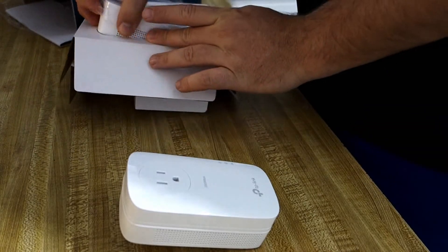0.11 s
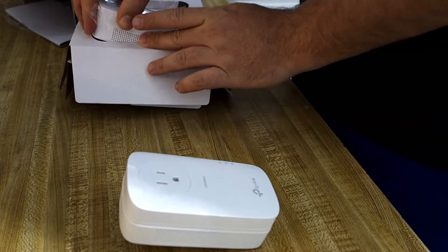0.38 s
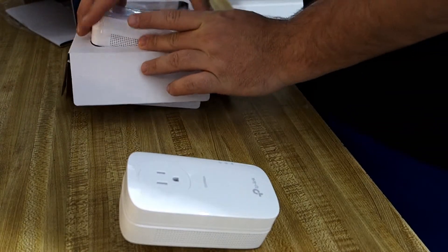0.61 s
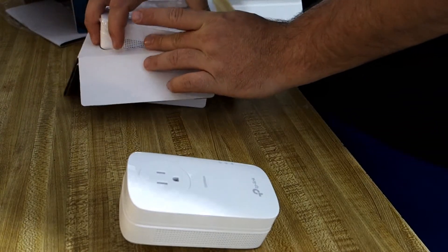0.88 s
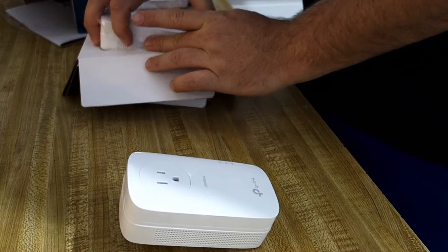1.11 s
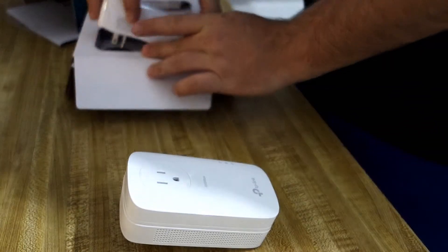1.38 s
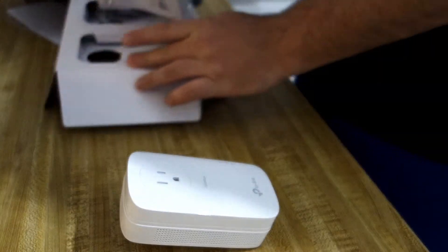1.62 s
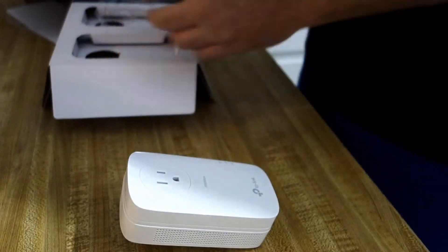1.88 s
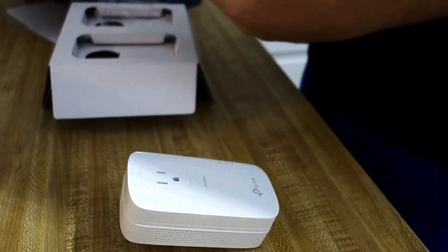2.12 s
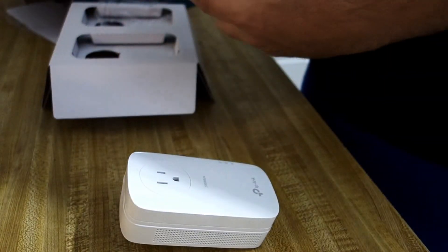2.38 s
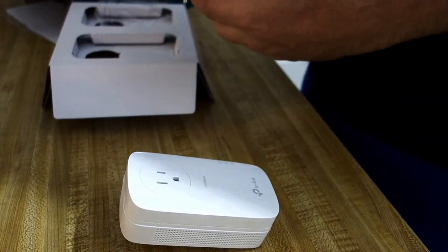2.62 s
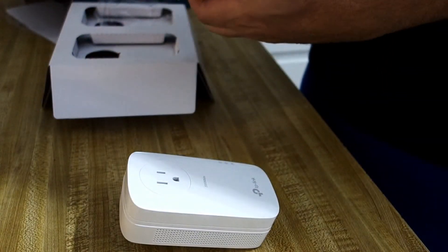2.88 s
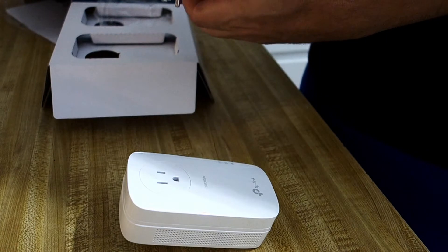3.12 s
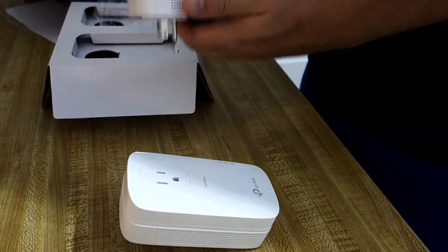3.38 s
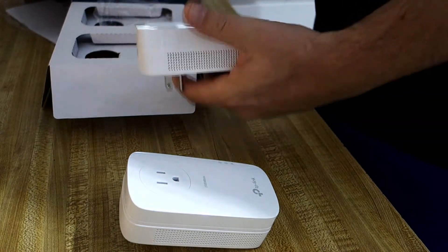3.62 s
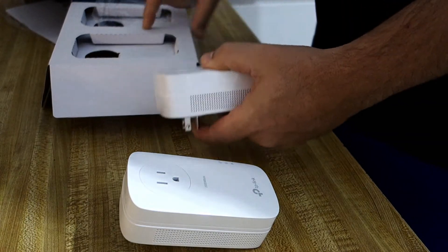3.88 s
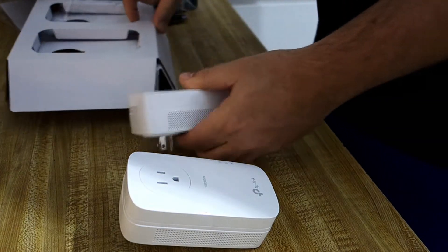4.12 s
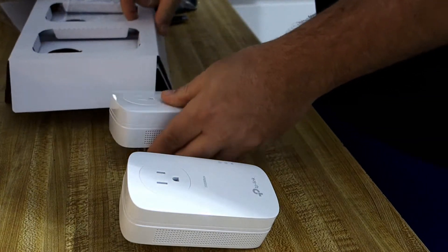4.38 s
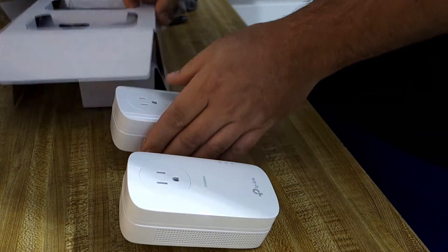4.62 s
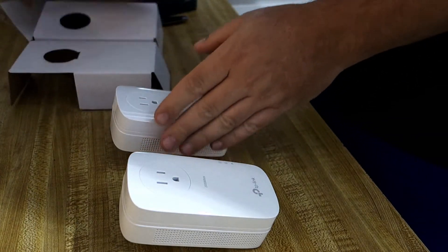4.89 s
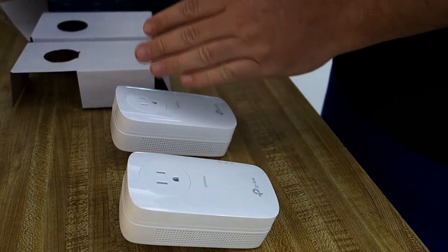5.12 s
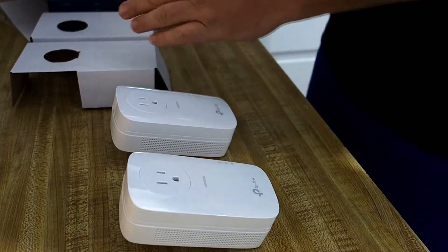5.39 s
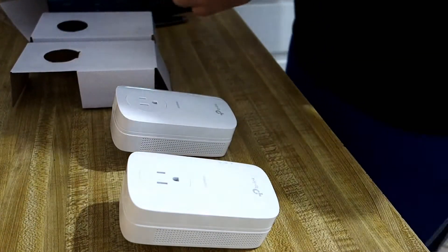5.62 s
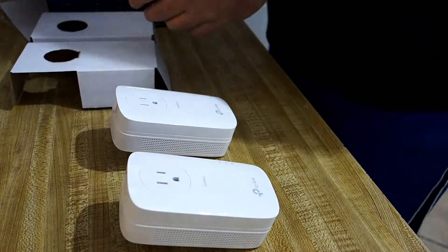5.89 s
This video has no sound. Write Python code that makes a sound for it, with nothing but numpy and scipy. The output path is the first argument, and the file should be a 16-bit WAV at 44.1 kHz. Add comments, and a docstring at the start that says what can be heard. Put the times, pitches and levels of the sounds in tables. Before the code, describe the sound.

Stiff cardboard scrapes and bumps, a plastic case creaks out, thin film crinkles and snaps, then hard knocks land on a wooden table.

```python
"""A wooden table in a small room: hands work a plastic device out of a cardboard tray, peel a thin film off it
and set it down. Card rubs and bumps as uneven friction and sharp blows ring its panels, edges and the table top.
The case creaks out of its pocket in stick-slip jerks; the film crinkles in filtered grains and snaps in short
noise bursts, and late crinkles are fingers back on the cardboard, duller than film. The room answers with
decaying noise tails over soft air and a faint, wavering hum of sines."""
import sys
import numpy as np
from scipy import signal
from scipy.fft import rfft, irfft, next_fast_len
from scipy.io import wavfile
from scipy.ndimage import uniform_filter1d

SR = 44100
rng = np.random.default_rng(int(sys.argv[2]) if len(sys.argv) > 2 else 0)


def gain_from_db(level_db):
    """Turn a decibel level (scalar or array-like) into a linear amplitude factor."""
    decades = np.asarray(level_db, float) / 20
    return 10 ** decades


def wav_record(signal):
    """Record a signal, one row per channel, as 16-bit PCM in the file named by sys.argv[1]."""
    frames = np.transpose(np.atleast_2d(signal))
    bounded = np.clip(frames, -1, 1)
    # unit amplitude maps onto the largest positive 16-bit level
    quanta = np.round(bounded * 32767).astype(np.int16)
    wavfile.write(sys.argv[1], SR, quanta)


N = 265041


def unit(x):
    """Scale to rms 1."""
    return x / np.sqrt(np.mean(x ** 2) + 1e-20)


def in_time(rows, outside=-90):
    """Join columns by straight lines over time; outside the table the first one takes the value given."""
    s, level, *rest = np.transpose(rows)
    t = np.arange(N) / SR
    return [np.interp(t, s, level, outside, outside)] + [np.interp(t, s, c) for c in rest]


def at_hz(points, hz):
    """Read a curve over frequency on a log axis."""
    p = np.array(points)
    return np.interp(np.log(np.maximum(hz, 1)), np.log(p[:, 0]), p[:, 1])


def shaped(x, points):
    """Colour a sound by a spectrum in dB."""
    size = next_fast_len(N)
    hz = np.arange(size // 2 + 1) * SR / size
    return irfft(rfft(x, size) * gain_from_db(at_hz(points, hz)), size)[..., :N]


def drift(rate_hz):
    """Slow random wander of spread 1: noise through two equal low-pass poles, run at every 40th sample."""
    r = np.exp(-80 * np.pi * rate_hz / SR)
    noise = rng.standard_normal(N // 40 + 2002)
    slow = signal.lfilter([1], [1, -2 * r, r * r], noise)[2000:]
    return np.interp(np.arange(N) / 40, np.arange(len(slow)), unit(slow - slow.mean()))


def resonance(x, hz, width_hz):
    """Two-pole resonance, gain 1 on top; a narrower one rings longer."""
    r = np.exp(-np.pi * width_hz / SR)
    poles = [1, -2 * r * np.cos(2 * np.pi * hz / SR), r * r]
    return signal.lfilter([(1 - r * r) / 2, 0, (r * r - 1) / 2], poles, x + 1e-18)


def grains(per_s, spread_db, smooth):
    """Tiny catches of uneven size over a smooth friction hiss; rms 1."""
    sizes = gain_from_db(spread_db * np.minimum(rng.exponential(1, N), 5)) * rng.choice([-1, 1], N)
    catches = sizes * (rng.random(N) < per_s / SR)
    return unit(unit(catches) + smooth * rng.standard_normal(N))


def body(force, modes, wander_db):
    """Each mode rings under its force (one row a mode); the grip shifts, so modes come and go."""
    scale = np.sqrt(sum(gain_from_db(2 * db) * np.pi * width / SR for hz, width, db in modes))
    force = np.broadcast_to(force, (len(modes), N))
    out = 0
    for k, (hz, width, db) in enumerate(modes):
        drive = force[k] * gain_from_db(db + wander_db * drift(18))
        out = out + (-1) ** k * resonance(drive, hz, width)   # neighbours in opposite phase
    return out / scale


def near(hz, struck_hz, octaves):
    """Modes close to the struck pitch answer most; distant ones are at most 15 dB weaker."""
    return gain_from_db(-np.minimum(6 * (np.log2(hz / struck_hz) / octaves) ** 2, 15.0))


def gestures(rows, swell_db):
    """Each movement swells to its peak and fades until the next begins; gives level dB and colour dB."""
    t = np.arange(N) / SR
    moves = np.array(rows)
    k = np.searchsorted(moves[:, 0], t, side="right") - 1
    start, swell_s, peak_db, fade, colour_db = moves[np.maximum(k, 0)].T
    since = t - start - swell_s   # time since the peak
    rise_db = -since / np.maximum(swell_s, 1e-3) * swell_db
    db = peak_db - np.where(since < 0, rise_db, since * fade)
    return np.where(k < 0, -120, np.maximum(db, -120)), colour_db


def follow(db_at_mean, share, pressure_db):
    """Gain of a part that follows a share of the pressure swing; it stops when the hand lets go."""
    mean_db = -25
    return gain_from_db(db_at_mean + share * (pressure_db - mean_db)) * (pressure_db > -75)


def background():
    """Coloured noise for the room air, mid and side, plus sines wavering in level and phase for the hum, mid only."""
    # hum partials: (frequency [Hz], level before waver [dB rms])
    partials = [(59.2, -47.5), (134.6, -54.5), (183.0, -53), (360.7, -57.5), (430.7, -60.5), (549.1, -57.5)]
    # colour of the air: (frequency [Hz], relative level [dB])
    air_colour = [(65, -32), (110, 1.5), (358, -1.5), (499, -11.5), (553, 0), (613, -6), (967, -10),
                  (3490, -20.5), (6500, -24.5), (15500, -42)]
    t = np.arange(N) / SR
    hum = 0
    for hz, db in partials:
        level = np.sqrt(2) * gain_from_db(db + 1.5 * drift(19))
        hum = hum + level * np.sin(2 * np.pi * hz * t + 1.4 * drift(0.67))
    air = gain_from_db(-39 - 6) * unit(shaped(rng.standard_normal((2, N)), air_colour))
    return air + hum * np.array([[1], [0]])


def tray():
    """Rubbing and bumps drive panels, edges and table; a bump is one hard contact, then chatter that dies."""
    # card rubbing on card, each stroke lasts until the next:
    # (start [s], swell [s], peak drive [dB], fade [dB/s], edge brightness [dB])
    strokes = [(0.0, 0.028, -27, 80, -5), (0.1, 0.017, -25, 70, -3.5), (0.16, 0.0034, -16.5, 157, 1),
               (0.284, 0.0014, -18, 93, 0.5), (0.348, .003, -24.5, 60, 1), (0.42, .003, -33, 250, 1),
               (0.454, 0.0019, -27.5, 149, 2.5), (0.513, 0.0039, -26.5, 208, -6),
               (0.54, 0.022, -31, 150, 0.5), (0.605, 0.0069, -23, 123, -2.5),
               (0.655, 0.0032, -21.5, 26, -5), (0.818, 0.018, -12.5, 167, 0.5), (0.945, 0.026, -26, 32, 0),
               (1.043, .004, -21.5, 6, 2), (1.322, 0.0025, -12.5, 75, -3.5), (1.49, 0.025, -9.5, 117, -5),
               (1.587, 0.029, -19.5, 150, -0.5), (1.658, 0.0036, -22, 20, -1.5),
               (1.74, .003, -21.5, 197, -4), (3.9, 0.0033, -18.5, 127, -3.2), (3.948, .09, -15.5, 100, -2),
               (4.083, 0.013, -21.5, 120, 0), (4.135, 0.013, -22.5, 117, -1), (4.266, 0.061, -19, 84, -5),
               (4.63, .05, -31.5, 53, -4.5), (4.684, 0.0055, -25.5, 107, -2.5),
               (4.86, 0.083, -31.5, 60, -0.5), (5.014, 0.019, -10, 92, 3), (5.105, 0.0033, -25, 113, 0.2)]
    # how the tray is held: (time [s], surface hiss [dB], panel rubbed [Hz], weight on the table [dB])
    grip = [(0.0, -4, 695, 1.5), (0.4, 2.1, 734, 0.5), (0.85, -1.3, 690, -2), (1.15, 7.5, 694, -1),
            (1.7, -5.5, 775, 0.5), (3.9, 0.5, 750, 1), (4.15, 5.5, 900, 1), (4.35, -10.5, 630, 8),
            (4.7, -1.5, 780, -2), (5.3, -7.5, 860, -7)]
    # slips and bumps of tray and case:
    # (time [s], drive [dB], edge brightness [dB], chatter t60 [s], panel struck [Hz])
    bumps = [(0.044, -16, -5.5, 0.049, 654), (0.098, -21.5, -14, 0.12, 410), (0.165, -12, -4.5, .1, 584),
             (0.348, -33, 3, .1, 940), (0.39, -20, -26, .15, 460), (0.514, -16.5, -28, 0.025, 730),
             (0.546, -25, 14.5, 0.074, 450), (0.655, -21, -19, 0.16, 920), (0.821, -10.5, -4, 0.095, 544),
             (1.044, -29, 0, 0.096, 700), (1.324, -1, 1, 0.069, 466), (1.512, -7.5, -2, 0.26, 800),
             (1.587, -12, -6.5, 0.27, 710), (1.66, -10, -2.7, 0.14, 764), (2.795, -41, 29, 0.21, 1210),
             (3.06, -27, 1, 0.096, 460), (3.156, -15, -12, 0.054, 480), (3.303, -17, -14, 0.091, 447),
             (3.367, -14.5, -10, 0.29, 1250), (3.903, -17.5, 4.5, 0.027, 990), (3.95, -19.5, 2, .2, 670),
             (3.978, -18, -0.5, 0.53, 630), (4.085, -5, -6.5, 0.18, 1000), (4.262, -22.5, 4, 0.095, 895),
             (4.269, -19, -10, 0.037, 840), (4.302, -2.5, -6.5, 0.15, 750), (4.551, -33.5, -6, 0.28, 860),
             (4.59, -28, -10, 0.052, 860), (4.696, -17, -2.5, 0.11, 760), (4.777, -22.5, 0.3, 0.097, 840),
             (4.914, -25, 2, 0.35, 676), (4.943, -10.5, 1, 0.087, 880), (5.015, -19, 5, 0.13, 910),
             (5.864, -30.5, 5, 0.49, 555)]
    # tray or case lands on the table: (time [s], drive [dB], chatter t60 [s], table pitch struck [Hz])
    thuds = [(0.167, -21.5, 0.088, 183), (0.389, -37, 0.13, 273), (0.621, -30, .1, 140),
             (0.821, -35, .1, 200), (1.0, -33, .2, 120), (1.325, -22.5, .12, 126), (1.512, -25, 0.39, 221),
             (3.903, -29.5, 0.046, 226), (3.979, -29, 0.39, 290), (4.269, -17, 0.055, 198),
             (4.301, -10.5, 0.11, 120), (4.552, -34, 0.27, 222), (4.589, -31.5, .1, 220),
             (4.912, -29, 0.29, 250), (4.942, -28.5, .08, 236), (5.015, -36, 0.21, 284),
             (5.866, -40.5, 0.37, 218)]
    # modes of the tray's panels: (frequency [Hz], width [Hz], relative level [dB])
    panels = [(393, 90, -0.5), (464, 100, -1), (566.5, 70, -4), (670, 76, -2.5), (804, 92, -9),
              (939, 34, 1.5), (932.2, 65.3, 4), (1120, 69, -5.5), (1150, 38, -2), (1372, 102, -1.5)]
    # modes of the tray's edges: (frequency [Hz], width [Hz], relative level [dB])
    edges = [(1574, 147, 8), (1692, 390, 7), (2040, 295, 7.5), (2350, 390, 5), (2660, 684, 2),
             (3280, 510, 0.5), (3760, 285, -1), (4140, 450, -4), (4930, 830, -10), (6430, 510, -13.5)]
    # modes of the table top: (frequency [Hz], width [Hz], relative level [dB])
    table_modes = [(124.5, 49, 1), (135.2, 60, -3.5), (187.4, 63, -7), (223, 64, -2.5), (276, 39, -5.5),
                   (334, 35, -1)]
    # colour of torn card fibres: (frequency [Hz], relative level [dB])
    fibre_colour = [(1500, -28), (3000, -2), (5300, -0.5), (9000, -5), (13000, -11), (16000, -15)]

    friction = grains(per_s=2500 * gain_from_db(3.0 * drift(45)), spread_db=4.5, smooth=1.0)
    panel_hz, edge_hz, table_hz = (np.array(modes)[:, :1] for modes in (panels, edges, table_modes))
    press_db, bright_db = gestures(strokes, swell_db=5.5)
    rough_db, rubbed_hz, weight_db = in_time(grip, outside=0)
    # edges, table and surface hiss follow the pressure less than the panels
    panel = gain_from_db(press_db) * friction * near(panel_hz, rubbed_hz, octaves=0.95)
    edge = follow(-25.5, 0.79, press_db) * gain_from_db(bright_db) * friction * np.ones_like(edge_hz)
    table = follow(-35, 0.72, press_db) * gain_from_db(weight_db) * friction * np.ones_like(table_hz)
    hiss = follow(-40.5, 0.4, press_db) * gain_from_db(rough_db + 0.16 * bright_db)

    t = np.arange(SR // 2) / SR
    for s, db, edge_db, t60, struck_hz in bumps:
        i = round(s * SR)
        n = min(len(t), N - i)
        chatter = gain_from_db(db - 60 * t[:n] / t60) * friction[i:i + n]
        blow = chatter + 2.34 * gain_from_db(db) * np.exp(-t[:n] / 0.00021)
        hiss[i:i + n] += gain_from_db(db + edge_db - 22 - 60 * t[:n] / 0.14)   # fibres tear at the start of a slip
        panel[:, i:i + n] += blow * near(panel_hz, struck_hz, octaves=0.57)
        rim_hz = 2320 * 2 ** (0.14 * edge_db)   # brighter bumps strike higher on the edges
        edge[:, i:i + n] += blow * gain_from_db(edge_db) * near(edge_hz, rim_hz, octaves=1.0)
        table[:, i:i + n] += blow * gain_from_db(-25)
    for s, db, t60, thud_hz in thuds:
        i = round(s * SR)
        n = min(len(t), N - i)
        chatter = 0.67 * gain_from_db(-60 * t[:n] / t60) * friction[i:i + n]
        push = chatter + 14.7 * np.exp(-t[:n] / 0.00016)
        table[:, i:i + n] += gain_from_db(db) * push * near(table_hz, thud_hz, octaves=0.38)

    out = body(panel, panels, wander_db=1.5) + body(edge, edges, wander_db=1.5)
    out = out + body(table, table_modes, wander_db=1.5)
    # a small table radiates no deep bass
    out = signal.sosfilt(signal.butter(2, 95, "high", fs=SR, output="sos"), out)
    # torn card fibres hiss, duller than film
    fibres = grains(per_s=3100, spread_db=4.0, smooth=0.84)
    return out + hiss * unit(shaped(fibres, fibre_colour))


def film():
    """Clumps of tiny creases crinkle and shake the broad folds; larger creases snap, low ones ringing longer."""
    # fingers pull at thin film, late ones move on the cardboard; each movement lasts until the next:
    # (start [s], swell [s], peak drive [dB], fade [dB/s], stiffness as level of broad folds over crinkle [dB])
    pulls = [(1.93, 0.075, -44.5, 40, -4), (2.08, 0.017, -40.5, 350, -3.5), (2.14, .003, -64, 12, -3),
             (2.28, .06, -30, 170, -4.5), (2.39, 0.036, -35, 130, -2.5), (2.55, 0.052, -30.5, 238, -6),
             (2.64, 0.0057, -28, 2, -7), (2.74, 0.047, -25.5, 95, -3.5), (2.91, 0.013, -25.5, 262, -4),
             (2.99, 0.026, -17.5, 113, -6.5), (3.126, 0.024, -18.5, 211, -3),
             (3.24, 0.073, -17.5, 130, -2.5), (3.33, 0.046, -15, 97, -4.5), (3.5, 0.023, -26, 92, -3.5),
             (3.666, 0.0027, -39, 182, 0.3), (3.812, .072, -42.5, 897, -8), (5.2, 0.016, -50, 27, 4.5),
             (5.368, .003, -45, 60, 1.5), (5.44, 0.044, -41, 120, -4), (5.54, .003, -50.5, 25, 0),
             (5.835, 0.0085, -35.5, 2, -5), (5.94, 0.0024, -33.5, 300, -9), (5.976, 0.024, -29.5, 50, -7)]
    # single snaps: (time [s], peak level [dB], pitch [Hz])
    snaps = [(0.05, -18.5, 12000), (0.085, -16, 11000), (0.095, -17.5, 11000), (0.671, -18, 10500),
             (0.679, -16, 10600), (1.853, -33, 6000), (1.896, -27, 5940), (2.037, -26, 2570),
             (2.103, -21.5, 2740), (2.309, -18.5, 3520), (2.332, -12, 8400), (2.434, -17, 5800),
             (2.587, -11.5, 9600), (2.601, -17.5, 2190), (2.6412, -7, 13500), (2.667, -15, 6300),
             (2.735, -8, 8850), (2.766, -6, 8500), (2.798, -5, 2240), (2.811, -21, 1920), (2.825, -7, 6800),
             (2.847, -9, 7040), (2.867, -11.5, 6600), (2.928, -14, 3960), (2.997, -6.5, 3520),
             (3.008, -7, 5640), (3.025, -4, 9900), (3.145, 2.5, 12600), (3.338, -8, 10200),
             (3.45, -18, 2350), (3.531, -2.5, 2040), (3.563, -12, 3670), (3.617, -16, 2670),
             (3.633, -17, 6130), (3.75, -25.5, 3000), (3.786, -20.5, 8800), (3.848, -30.5, 3440),
             (5.371, -17, 3330), (5.451, -24.5, 2960), (5.494, -36, 3070), (5.584, -30, 2870),
             (5.704, -28, 4800), (5.79, -20, 4200), (5.911, -31, 2360), (5.988, -32, 4730)]
    # colour of the crinkle: (frequency [Hz], relative level [dB])
    crinkle_colour = [(1500, -47), (3000, -5), (5300, 1.5), (9000, 1.5), (13000, -2), (16000, -5.5)]
    # modes of the broad folds: (frequency [Hz], width [Hz], relative level [dB])
    fold_modes = [(460, 54, -1.5), (990, 160, -6), (1264, 66, 0), (1830, 680, -0.5), (3000, 1700, -4.5),
                  (3520, 830, -22)]

    force = grains(per_s=3000 * gain_from_db(3.5 * drift(90)), spread_db=0.0, smooth=1.0) * gain_from_db(0.97 * drift(28))
    db, stiff_db = gestures(pulls, swell_db=15.5)
    crinkle = gain_from_db(db) * unit(shaped(force, crinkle_colour))
    out = crinkle + body(force * gain_from_db(db + stiff_db), fold_modes, wander_db=3.0)

    t = np.arange(1500) / SR
    for s, peak_db, hz in snaps:
        noise = rng.standard_normal(len(t))
        crack = noise * (gain_from_db(-60 * t / .014) + .3 * gain_from_db(-60 * t / .07))   # the sheet shivers after
        ring = noise * gain_from_db(-60 * t / (45 / hz + .01))
        snap = 0.42 * signal.lfilter([1, -1], [1, -.7], crack) + 2.1 * resonance(ring, hz, .5 * hz)
        i = round(s * SR)
        out[i:i + len(t)] += (gain_from_db(peak_db) * snap / np.abs(snap).max())[:N - i]

    # late crinkles are fingers back on the cardboard, which sound duller than film
    card_s, card_cut_hz = 4.5, 11300
    dull = signal.sosfilt(signal.butter(1, card_cut_hz, fs=SR, output="sos"), out)
    return np.where(np.arange(N) / SR < card_s, out, dull)


def drag():
    """Uneven stick-slip jerks ring the plastic case, damped by the grip."""
    # the case drags out of its pocket: (time [s], level [dB], nominal slip rate [1/s])
    pull = [(1.043, -34, 164), (1.093, -17.5, 193), (1.217, -20.5, 213), (1.317, -30.5, 190)]
    # modes of the gripped case: (frequency [Hz], width [Hz], relative level [dB])
    case_modes = [(620, 230, 0), (1560, 130, 5.5), (1830, 180, 4.5), (2350, 330, 0.5), (3140, 160, -2.5),
                  (4050, 300, 1), (5060, 540, -6), (6750, 1200, -12.5), (9700, 3800, -19.5)]
    db, per_s = in_time(pull)
    turns = np.cumsum(per_s * np.abs(1 + 0.38 * drift(60)) / SR)
    jerks = np.diff(np.floor(turns), prepend=0) * gain_from_db(1.1 * rng.standard_normal(N))   # one per whole turn
    force = unit(unit(jerks) + .55 * rng.standard_normal(N))
    return body(force * gain_from_db(db), case_modes, wander_db=0.6)


def room(x):
    """Two unrelated tails of reflections, each octave dying at its own pace."""
    # decay of the room: (frequency [Hz], t60 [s])
    room_t60 = [(150, 0.4), (1000, 0.34), (4000, 0.25), (12000, 0.18)]
    t, tails = np.arange(SR // 2) / SR, 0
    for hz in 60 * 2. ** np.arange(8):
        band = signal.butter(2, [hz, 2 * hz], "band", fs=SR, output="sos")
        fall = gain_from_db(-60 * t / at_hz(room_t60, 1.66 * hz)) * (t > .004)   # first reflections after 4 ms
        tails = tails + signal.sosfilt(band, rng.standard_normal((2, len(t)))) * fall
    tails = tails / np.sqrt(np.sum(tails ** 2, axis=1, keepdims=True))
    return signal.fftconvolve(x[None], tails, axes=1)[:, :N]


def scene():
    """Close microphones hear the bass nearly alike; random fast wander and the room's side tail widen the treble."""
    # stereo width: (frequency [Hz], gain of the side signal [dB])
    side_colour = [(60, -33), (180, -24), (550, -12), (1650, -6.5), (4970, 0.5), (15000, 2)]
    room_db = -10.5
    close = tray() + film() + drag()
    wet, air = room(close), background()
    # random fast wander between the channels
    wander = drift(100) * close + 0.3 * drift(51) * np.gradient(close)
    mid = close + gain_from_db(room_db) * wet[0] + air[0]
    side = shaped(gain_from_db(-7.5) * wander + gain_from_db(room_db - 2.0) * wet[1] + air[1], side_colour)
    bass = signal.sosfilt(signal.butter(2, 400, fs=SR, output="sos"), mid)
    side -= .09 * bass   # the bass sits slightly right
    return np.array([mid + side, mid - side])


def roll_off(x):
    """The treble ends steeply here."""
    return signal.sosfilt(signal.butter(12, 16970, fs=SR, output="sos"), x)


def record(dry):
    """Fast gain control holds the peaks down, a soft clip rounds them and the top is cut."""
    limit_db, squeeze, release_db_per_s = -5, .6, 250   # squeeze: share of the excess taken away
    ramp = release_db_per_s * np.arange(N) / SR
    level_db = 20 * np.log10(np.abs(dry).max(axis=0) + 1e-9)
    held_db = np.maximum.accumulate(level_db + ramp) - ramp   # jumps up at once, falls at the release rate
    cut_db = uniform_filter1d(np.maximum(held_db - limit_db, 0), size=15) * squeeze
    rounded = .9 * np.tanh(dry * gain_from_db(-cut_db) / .9)
    mix = signal.sosfilt(signal.cheby2(12, 60, 16700, fs=SR, output="sos"), rounded)   # 60 dB down from 16.7 kHz
    return roll_off(mix)


dry = scene()
out = record(dry)
wav_record(out)
```